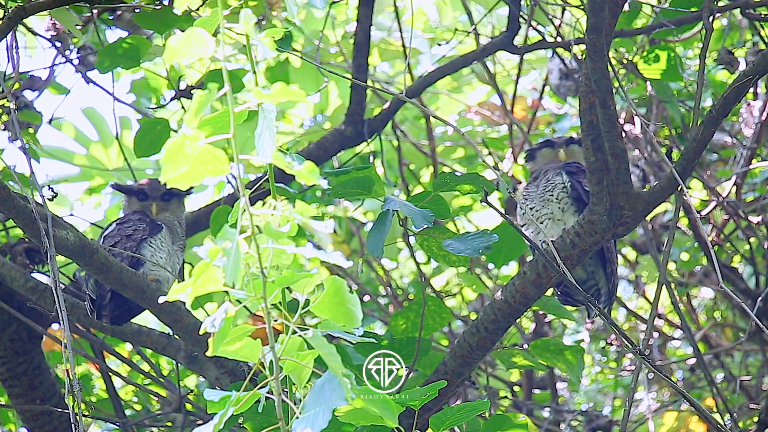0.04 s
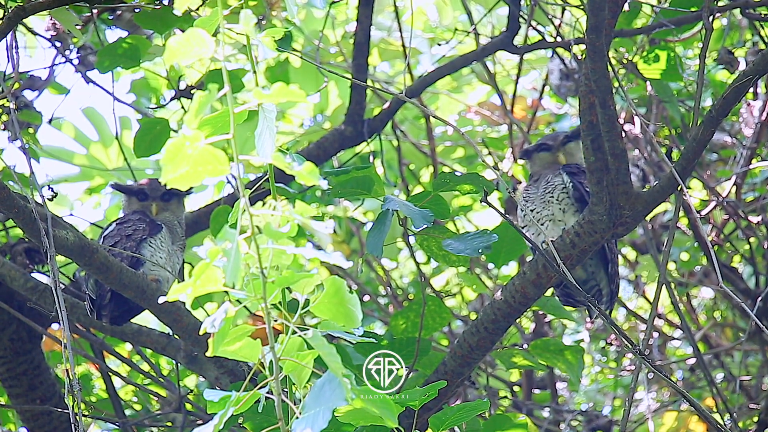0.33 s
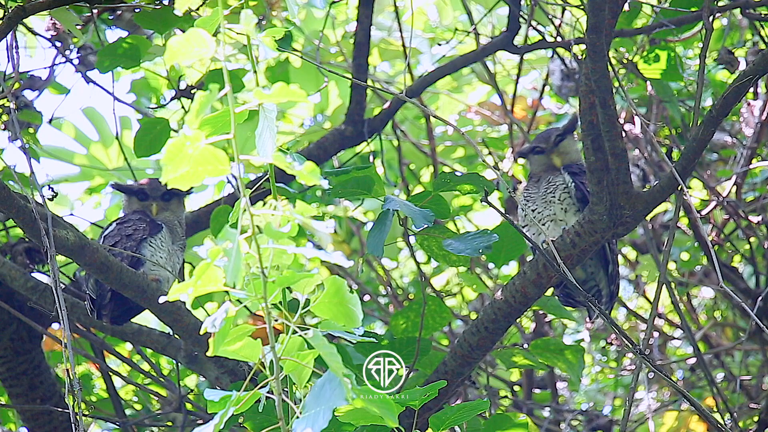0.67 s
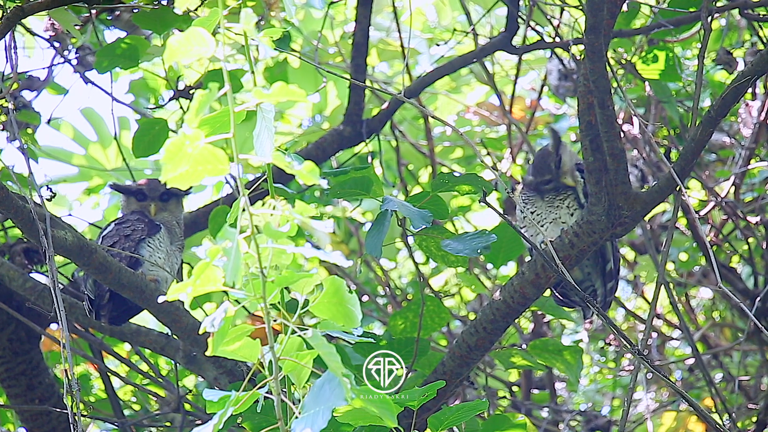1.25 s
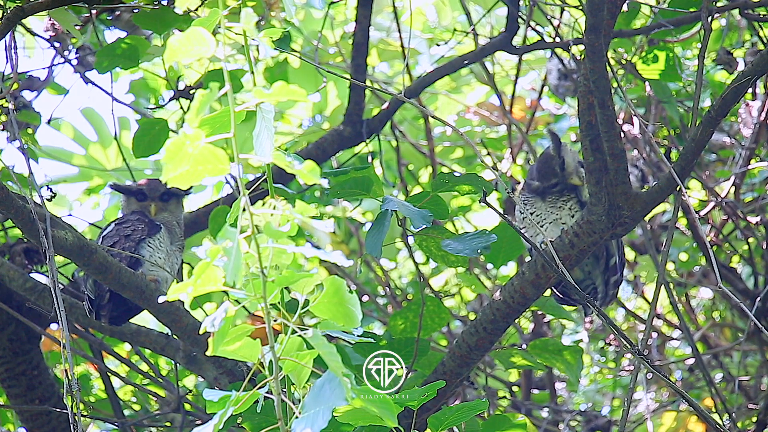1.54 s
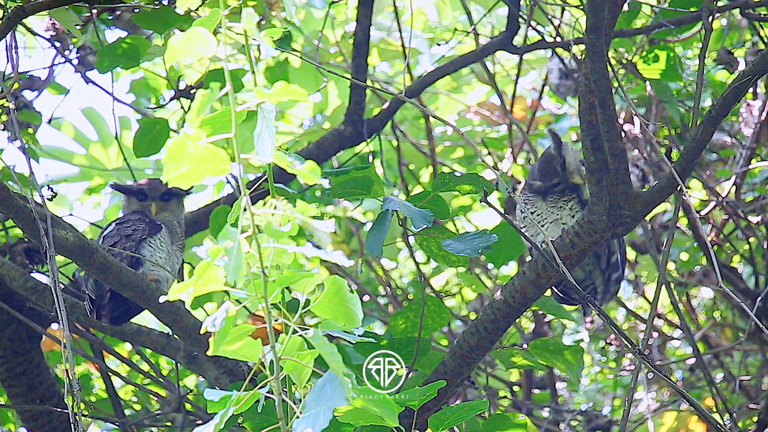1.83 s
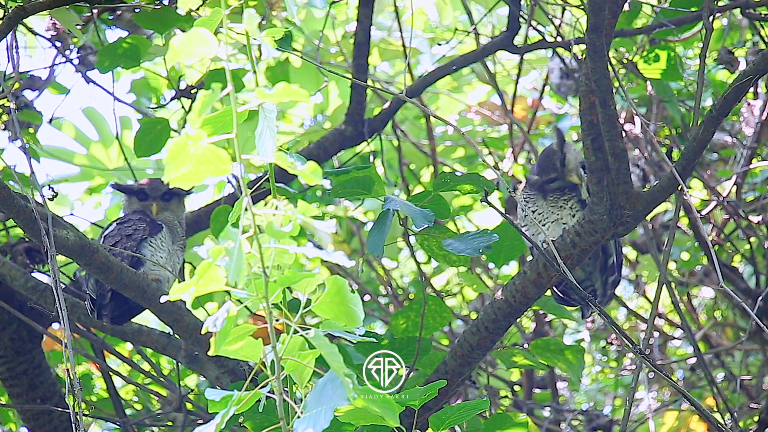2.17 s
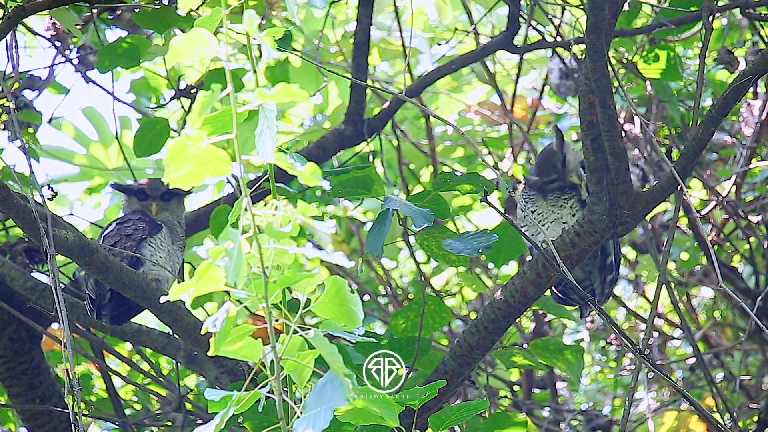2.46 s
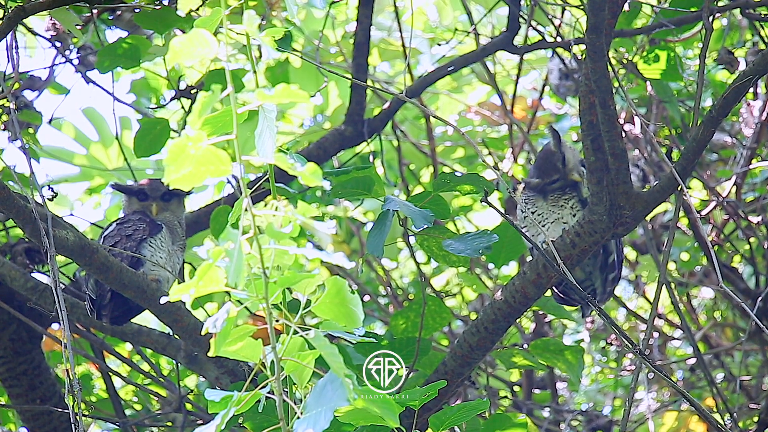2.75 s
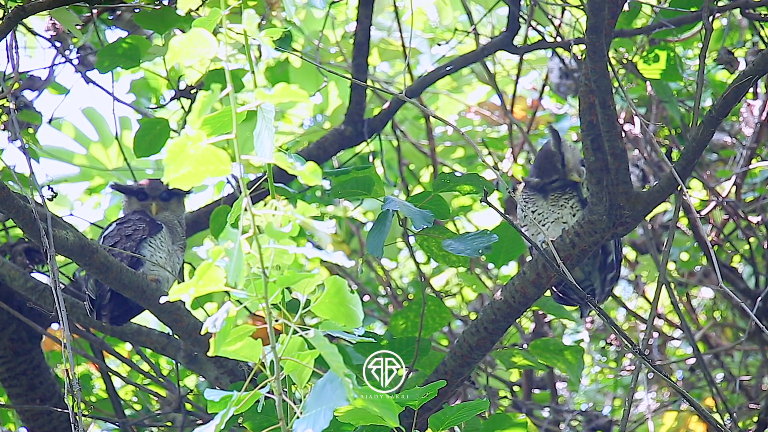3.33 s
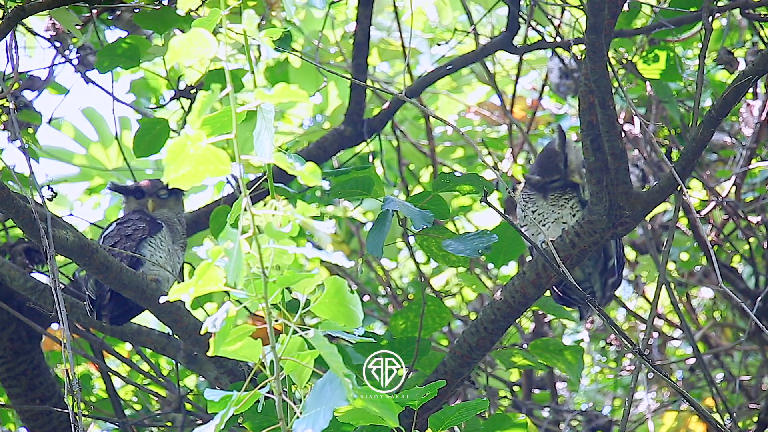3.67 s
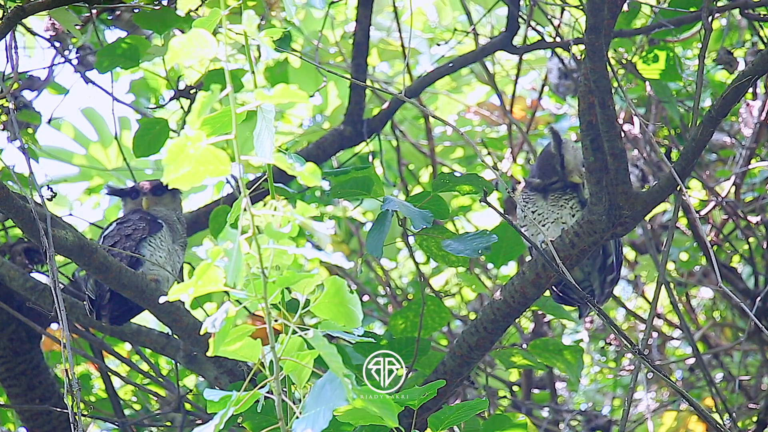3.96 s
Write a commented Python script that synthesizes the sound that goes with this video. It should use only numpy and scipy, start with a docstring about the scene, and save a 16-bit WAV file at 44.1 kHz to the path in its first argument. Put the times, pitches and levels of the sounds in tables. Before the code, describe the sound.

Repeated animal hoots echo among trees, with brief high bird chirps over hissing leaves.

```python
"""Under a leafy forest canopy, an animal hoots in a long, slowing series.
Each note arches in pitch, sounds mostly on its third harmonic and rings on among the trees.
Close by, a small bird fires four bursts of steeply falling chirps. Thin insect tones,
faint far whistles and a few twig ticks lie over the steady hiss of foliage."""
import sys
import numpy as np
from scipy import signal
from scipy.fft import rfft, irfft, next_fast_len
from scipy.io import wavfile

SR = 44100
rng = np.random.default_rng(int(sys.argv[2]) if len(sys.argv) > 2 else 0)


def store_wav(level_fs):
    """Save 16-bit WAV to argv[1]."""
    pcm = np.round(np.clip(np.atleast_2d(level_fs), -1, 1) * 32767)
    wavfile.write(sys.argv[1], SR, pcm.T.astype(np.int16))


N = 176400
TIME = np.arange(-SR // 4, N) / SR  # s, with 0.25 s of lead-in
FIRST_ECHO_S = .02


def from_db(db):
    """Decibels to gain."""
    return 10 ** (np.asarray(db) / 20)


def unit_rms(x):
    """Scale to unit power."""
    return x / np.sqrt(np.mean(x ** 2) + 1e-20)


def db_at(spectrum, hz):
    """Interpolate a spectrum table over log frequency."""
    table_hz, db = np.transpose(spectrum)
    return np.interp(np.log(np.maximum(hz, 1)), np.log(table_hz), db)


def shaped_noise(gain_at):
    """Unit-power noise shaped by a gain per frequency."""
    size = next_fast_len(len(TIME), real=True)
    spectrum = rfft(rng.standard_normal(size)) * gain_at(np.fft.rfftfreq(size, 1 / SR))
    return unit_rms(irfft(spectrum, size)[:len(TIME)])


def drift(rate_hz):
    """Random wander of unit spread."""
    return shaped_noise(lambda f: 1 / (1 + (f / rate_hz) ** 2))


def gate(t, length_s, attack_s, release_s):
    """Quarter-sine attack, hold, quarter-sine release."""
    attack = np.sin(np.pi / 2 * np.clip(t / attack_s, 0, 1))
    release = np.sin(np.pi / 2 * np.clip((length_s - t) / release_s, 0, 1))
    return attack * release


# Foliage hiss: (frequency [Hz], relative level [dB])
FOLIAGE_SPECTRUM = [(60, -69), (128, -66.5), (250, -45.5), (363, -36.5), (440, -27), (572, -21.5),
                    (828, -8.5), (1030, -7), (1310, -1.5), (1520, -6), (1770, -6.5), (1970, -9),
                    (3460, -19), (4490, -23), (5700, -33.5), (6790, -32), (7560, -39), (9000, -45.2),
                    (10700, -59), (14000, -89.5)]


def foliage(level_db=-37, flicker_db=.62):
    """Distant leaves: an even hiss with a slight flicker."""
    gain = from_db(level_db + flicker_db * drift(24))
    return gain * shaped_noise(lambda f: from_db(db_at(FOLIAGE_SPECTRUM, f)))


# Insect tones: (centre [Hz], half-width [Hz], level [dB])
INSECT_BANDS = [(6643, 38, -64), (6880, 120, -62.5), (7134, 30, -68), (7194, 30, -66), (4600, 400, -60)]


def insects():
    """Far chorus: restless tones from narrow bands of noise."""
    return sum(from_db(db) * shaped_noise(lambda f: 1 / (1 + ((f - hz) / width_hz) ** 2))
               for hz, width_hz, db in INSECT_BANDS)


# Far whistles: (start [s], length [s], pitch [Hz], level [dB])
FAR_WHISTLES = [(.08, .44, 4625, -52), (1.0, .18, 4370, -54), (1.31, .08, 4630, -54)]


def whistles_and_pips(pip_hz=7520, pip_db=-65.5, pip_s=.05, first_pip_s=.274, pip_period_s=.561):
    """Faint wavering notes from far off: a few whistles and an evenly repeated pip."""
    phase_per_hz = 2 * np.pi * np.cumsum(1 + .004 * drift(90)) / SR
    whistles = sum(from_db(db) * gate(TIME - start, span, span / 2, span / 2) * np.sin(hz * phase_per_hz)
                   for start, span, hz, db in FAR_WHISTLES)
    pip_gate = gate((TIME - first_pip_s) % pip_period_s, pip_s, pip_s / 2, pip_s / 2)
    return whistles + from_db(pip_db) * pip_gate * np.sin(pip_hz * phase_per_hz)


# Twig snaps: (time [s], centre [Hz], level [dB], bandwidth [oct])
TWIG_TICKS = [(.162, 5570, -52, 0.7), (0.948, 7000, -57, 1.1), (1.0085, 5450, -41, .9),
              (1.079, 2660, -33, 0.55), (1.269, 2800, -34, 0.63), (1.581, 1810, -30.5, 1.1),
              (2.017, 3150, -39, 0.58), (2.195, 2360, -28.5, 0.74), (2.605, 5800, -40, 0.59),
              (3.68, 7160, -46, 0.98)]


def twig_ticks(decay_s=.0042, lowpass_hz=7000):
    """Tiny dry snaps: fast-decaying bursts of band-passed noise."""
    out = np.zeros_like(TIME)
    for start, hz, db, octaves in TWIG_TICKS:
        envelope = (TIME > start) * np.exp(-np.clip((TIME - start) / decay_s, 0, 20))
        burst = rng.standard_normal(len(TIME)) * envelope
        edges_hz = [hz * 2 ** (-octaves / 2), hz * 2 ** (octaves / 2)]
        band = signal.butter(3, edges_hz, "band", fs=SR, output="sos")
        out += from_db(db) * np.sqrt(SR / hz) * signal.sosfilt(band, burst + 1e-18)
    return signal.sosfilt(signal.butter(4, lowpass_hz, fs=SR, output="sos"), out)


# Chirp fundamental along the sweep: (frequency [Hz], gain [dB])
CHIRP_RESPONSE = [(4000, -21), (4280, -8), (4400, -8), (4550, -2.5), (4660, -0.4), (4800, -0.5),
                  (4950, -10), (5200, -4.5), (5600, -16), (6400, -12.5)]
# Its faint octave: (frequency [Hz], level [dB])
OCTAVE_RESPONSE = [(8000, -60), (8600, -50), (9150, -48), (9600, -60), (10000, -76), (11000, -88)]
# Chirps: (start [s], length [s], start pitch [Hz], fundamental level [dB], octave trim [dB])
BIRD_CHIRPS = [(2.215, .0195, 4670, -24.5, -1.5), (2.2535, 0.026, 6200, -19, 1),
               (2.2931, 0.029, 6320, -17.5, 0.5), (2.429, .025, 6140, -19, 2.5),
               (2.469, 0.028, 6440, -13, -3), (2.509, 0.03, 6300, -13.5, -8), (2.668, 0.027, 6410, -14, -1),
               (2.7104, 0.03, 6290, -13, -6), (2.753, 0.029, 6280, -13.5, -7), (2.928, 0.026, 6400, -14, 1),
               (2.967, 0.029, 6420, -13, -7.5), (3.011, 0.028, 6160, -13.5, -5)]


def bird_chirps(end_hz=4050, plunge_above_hz=5200, plunge_s=.0021):
    """Near-pure whistles plunge, then slide to one end pitch; a low start swells gently and only slides."""
    out = np.zeros_like(TIME)
    jitter, flutter_db = .0047 * drift(800), 3.2 * drift(400)
    for start, length, top_hz, db, octave_db in BIRD_CHIRPS:
        on = (TIME > start) & (TIME < start + length)
        t = TIME[on] - start
        plunge_share, attack_s = (.42, .00074) if top_hz > plunge_above_hz else (0, .006)
        height = plunge_share * np.exp(-t / plunge_s) + (1 - plunge_share) * (1 - t / length)
        hz = end_hz + (top_hz - end_hz) * height
        phase = 2 * np.pi * np.cumsum(hz * (1 + jitter[on])) / SR
        fundamental = from_db(db + db_at(CHIRP_RESPONSE, hz)) * np.sin(phase)
        octave = from_db(db_at(OCTAVE_RESPONSE, 2 * hz) + octave_db + flutter_db[on]) * np.sin(2 * phase)
        out[on] += (fundamental + octave) * gate(t, length, attack_s, release_s=.0044)
    return out


# Hoot partials: (harmonic number, gain [dB])
HOOT_HARMONICS = [(1, -33), (2, -22.5), (3, -0.9), (4, -35), (5, -29.5)]
# Hoots: (crest time [s], rise [s], fall [s], crest pitch [Hz], level [dB], fade after crest [dB/s],
#         strain [0-1], dip after crest [dB], opening rasp [dB])
HOOT_NOTES = [(-.091, 0.019, 0.045, 430, -20, 100, .16, 0, -15),
              (0.1323, 0.025, .0375, 431.7, -20.1, 103, .17, -3.5, -16),
              (0.3562, 0.025, 0.032, 431.7, -20.5, 124, 0.05, -2, -13.5),
              (0.5823, .0265, .0345, 437, -19, 244, 0.26, -1.1, -16.5),
              (0.816, 0.027, 0.035, 445.6, -19, 230, 0.18, 0.5, -18.5),
              (1.0484, 0.026, 0.044, 446.7, -18.5, 244, 0.26, -0.5, -19.5),
              (1.2911, 0.027, .0445, 453, -20, 169, 0.26, -13.5, -21.5),
              (1.5426, .0285, 0.049, 459.5, -21.5, 131, 0, -6, -23.5),
              (1.8023, .0285, .0435, 459.5, -20.5, 131, .19, -4.5, -25),
              (2.0704, 0.03, 0.047, 464.7, -20.5, 146, 0.11, -0.5, -22.5),
              (2.3363, .0285, .0455, 468, -19.5, 149, 0.04, -7.5, -22.5),
              (2.6156, 0.026, 0.047, 472.6, -19.5, 161, .14, -13, -25),
              (2.9066, .0245, 0.047, 470.7, -21, 330, 0.2, -5, -20),
              (3.2125, 0.031, 0.039, 469, -20.5, 53, .34, -1.1, -14.5),
              (3.5161, 0.038, 0.041, 494.8, -22.5, 23, 0.7, -2.1, -11.5),
              (3.8472, 0.034, 0.051, 489.3, -23.5, 72, .64, -5, -13.5)]


def hoots(dip_delay_s=.0175, dip_width_s=.0065, swell_db_per_s=381.5, highpass_hz=600):
    """Each note rasps on its way up, crests and drops away roughly; the third harmonic dominates."""
    out = np.zeros_like(TIME)
    jitter, shimmer_db = .03 * drift(170), 3.5 * drift(170)
    for crest, rise, fall, hz, db, fade_db_per_s, strain, dip_db, rasp_db in HOOT_NOTES:
        on = (TIME > crest - rise) & (TIME < crest + fall)
        t = TIME[on] - crest
        # Strained notes start lower, swell later, fall further and straighter.
        climb_oct = (.16 + .11 * strain) * np.abs(t / rise) ** 2.2
        drop_oct = (.28 + .11 * strain) * np.abs(t / fall) ** max(2.75 - 1.85 * strain, 1)
        swell = from_db(swell_db_per_s * strain * np.minimum(t, 0))
        roughness = np.maximum(strain, .55 * t / fall)
        arch_hz = hz * 2 ** -np.where(t < 0, climb_oct, drop_oct)
        phase = 2 * np.pi * np.cumsum(arch_hz * (1 + roughness * jitter[on])) / SR
        voice = sum(from_db(gain_db) * np.sin(round(k) * phase) for k, gain_db in HOOT_HARMONICS)
        voice *= swell * gate(t + rise, rise + fall, attack_s=.028, release_s=.01)
        rasp_gate = gate(t + rise, rise + .0036, attack_s=.01, release_s=.014)
        rasp = from_db(rasp_db) * np.sin(4 * phase) * rasp_gate
        dip = np.exp(-((t - dip_delay_s) / dip_width_s) ** 2)
        level_db = db + dip_db * dip - fade_db_per_s * np.maximum(t, 0) + roughness * shimmer_db[on]
        out[on] += (voice + rasp) * from_db(level_db)
    return signal.sosfilt(signal.butter(2, highpass_hz, "high", fs=SR, output="sos"), out + 1e-18)


def hoot_ringing(gain_db=-12.3, strain_loss_db=7, t60_s=1.35, onset_s=.04):
    """The third harmonic of each crest, where the pitch dwells longest, hangs wavering among the trees."""
    out = np.zeros_like(TIME)
    waver = 1 + .33 * (drift(20) + 1j * drift(20))
    for crest, _, _, hz, db, _, strain, _, _ in HOOT_NOTES:
        on = (TIME > crest + FIRST_ECHO_S) & (TIME < crest + t60_s / 2)
        t = TIME[on] - crest - FIRST_ECHO_S
        level_db = db + gain_db - strain_loss_db * strain - 60 * t / t60_s
        tone = np.real(waver[on] * np.exp(2j * np.pi * (3 * hz * t + rng.random())))
        out[on] += from_db(level_db) * np.minimum(t / onset_s, 1) * tone
    return out


def tree_echoes(x, gain_db, t60_s, echoes_per_s=1600):
    """A dying shower of small echoes from trunks and leaves."""
    lag = np.arange(SR) / SR
    echoes = rng.standard_normal(SR) * (rng.random(SR) < echoes_per_s / SR)
    echoes *= (lag > FIRST_ECHO_S) * from_db(-60 * lag / t60_s)
    return from_db(gain_db) * signal.fftconvolve(x, unit_rms(echoes) / np.sqrt(SR))[:len(x)]


def scene():
    """Far hoots wrapped in echoes, near bird and twigs almost dry, over the forest background."""
    far = hoots()
    near = bird_chirps() + twig_ticks()
    late = tree_echoes(far, gain_db=-9.5, t60_s=.75)
    early = tree_echoes(far, gain_db=-15, t60_s=.15)
    echoes = early + late + hoot_ringing() + tree_echoes(near, gain_db=-19.5, t60_s=.35)
    background = insects() + whistles_and_pips() + foliage()
    return (background + echoes + near + far)[None, -N:]


def record(dry):
    """Steep low-pass at 10553 Hz."""
    return signal.sosfilt(signal.ellip(10, .1, 80, 10553, fs=SR, output="sos"), dry)


dry = scene()
out = record(dry)
store_wav(out)
```